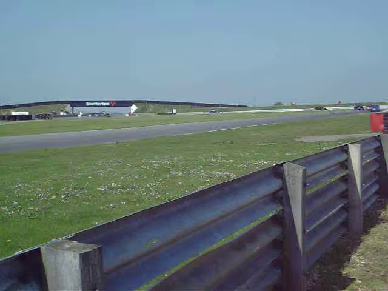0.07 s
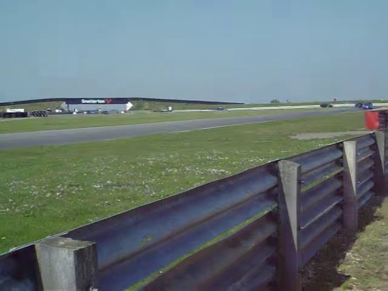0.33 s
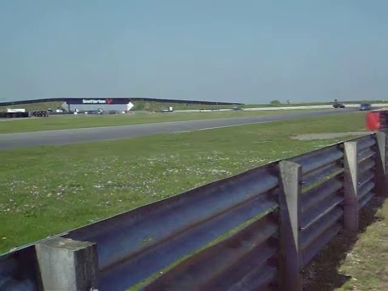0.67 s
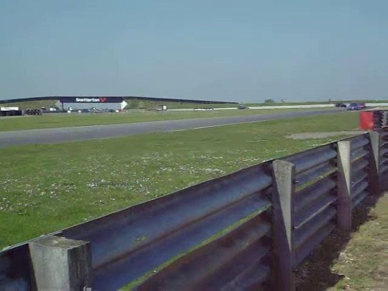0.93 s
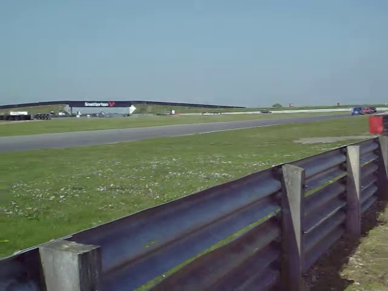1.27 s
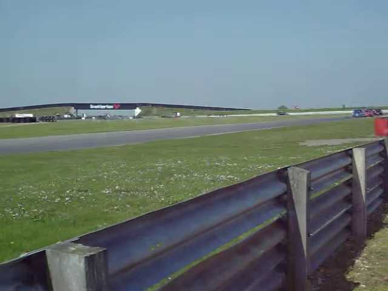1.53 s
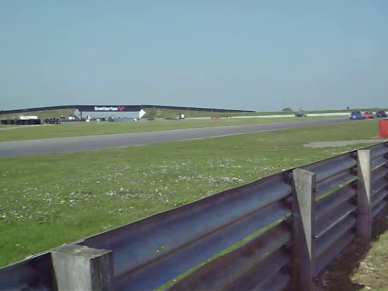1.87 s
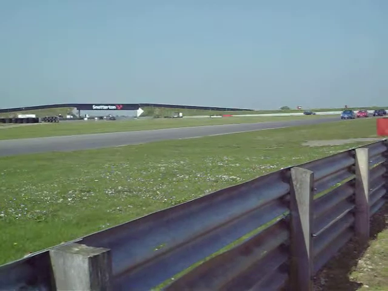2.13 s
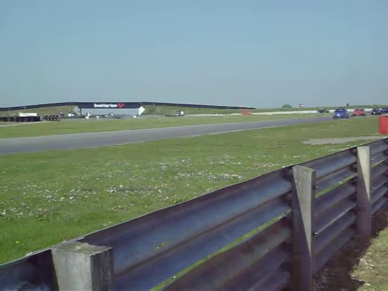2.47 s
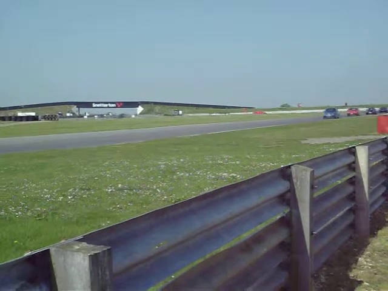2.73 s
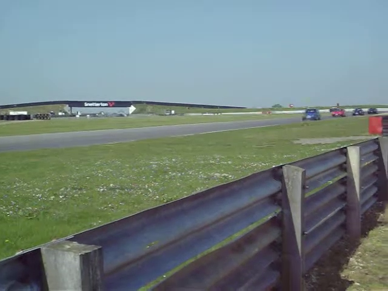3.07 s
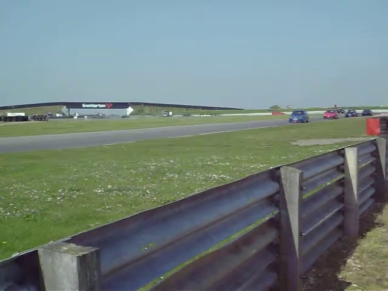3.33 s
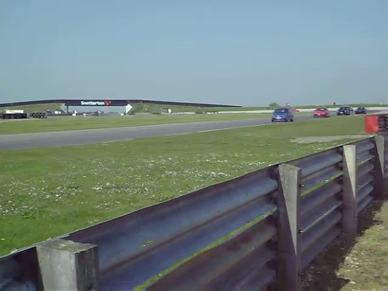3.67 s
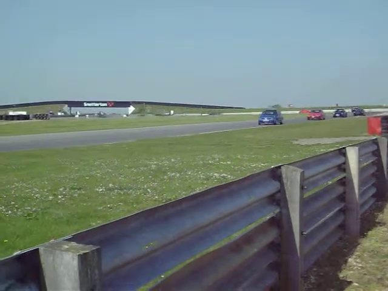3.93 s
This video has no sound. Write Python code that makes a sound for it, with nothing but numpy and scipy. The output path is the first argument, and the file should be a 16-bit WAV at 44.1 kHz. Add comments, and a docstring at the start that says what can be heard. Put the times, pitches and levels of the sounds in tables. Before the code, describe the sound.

A distant pack of racing cars makes a low, wavering drone that swells toward the end. Outdoors beside the track, wind buffets the microphone, with one sharp click early on, a faint thin whine and finally three faint chirps.

```python
"""Racing cars far across a circuit

From a microphone beside an open track, a pack of cars approaches from far off, each engine's firings
a low drone that climbs or falls. The roar of exhausts and tyres grows slowly; wind rumbles on the mic.
Close by, the camera whines faintly and its button clicks once, ducking the gain control for about
half a second. Three faint high chirps come near the end."""
import sys
import numpy as np
from scipy import signal
from scipy.fft import rfft, irfft
from scipy.io import wavfile

SR = 44100
rng = np.random.default_rng(int(sys.argv[2]) if len(sys.argv) > 2 else 0)


def transcribe(u):
    """Save the signal u as a 16-bit wav file named by the first command-line argument.

    u: samples, shape (n,) or (channels, n), limited to [-1, 1]; the rate is SR.
    q: integer samples, one column per channel.
    """
    v = np.clip(np.atleast_2d(u).T, -1, 1)
    q = np.round(v * 32767).astype(np.int16)
    wavfile.write(sys.argv[1], SR, q)


N = 176400
TIME = np.arange(N) / SR


def engines(orders=8, higher_orders_db=-39, trim_db=-1, fade_s=.053):
    """Single cars out on the track: a firing tone and its harmonics, fluttering through the air."""
    # One curve an engine. Each row: time in seconds, firing rate in Hz, firing tone in dB, octave in dB.
    curves = [
        [(.05, 122.2, -24.5, -42.5), (.5, 131.6, -23, -30.5), (.9, 138, -18, -37), (1.4, 146, -22.5, -38.5),
         (2.05, 155.5, -30, -37.5), (2.3, 158.8, -31, -44.5), (2.5, 155.8, -21.5, -48),
         (2.85, 137.1, -32, -41.5)],
        [(1.7, 118.3, -22.5, -63.5), (2.1, 122.4, -20.5, -51.5), (2.45, 120.7, -20, -37),
         (2.9, 119.7, -21.5, -38), (3.2, 118.1, -23.5, -42), (3.45, 119.5, -19, -28.5),
         (3.65, 120.6, -22, -26.5), (3.83, 122.2, -18, -21.5), (4.1, 123.5, -10, -32)],
        [(2.35, 161.4, -27.5, -53.5), (2.7, 168, -24, -69.5), (3, 176.4, -29.5, -58), (3.5, 186, -27, -56.5),
         (3.75, 189, -34, -64), (4.1, 195, -16.5, -62)],
        [(1.3, 89.8, -34.5, -36), (1.8, 98, -40, -35), (2.2, 105.2, -43.5, -31.5), (2.55, 110.8, -54, -39)],
        [(1.4, 129, -51, -49.5), (1.9, 133.4, -28.5, -36.5), (2.35, 137, -40.5, -40)],
        [(.9, 103.7, -34, -37), (1.3, 107.5, -46.5, -42.5), (1.7, 113, -35, -49), (2.2, 119.7, -57, -32),
         (2.55, 118.7, -55, -41.5)],
        [(.55, 109, -35.5, -82), (.8, 96.04, -21.5, -58), (1.2, 77.27, -35.5, -34.5), (1.5, 63.8, -30, -51.5),
         (1.8, 70.7, -30, -41.5), (2.2, 85.13, -24.5, -29.5), (2.45, 90.7, -24, -57.5), (3.1, 82, -27, -58),
         (4.1, 79, -27, -52)],
        [(.7, 109.3, -38, -65.5), (1.2, 103, -26.5, -61.5), (1.7, 94.3, -30, -38.5), (2.1, 93, -35, -43.5)],
        [(.6, 80.9, -55, -38.5), (.9, 84.7, -45, -26), (1.1, 84.5, -27, -26.5), (1.35, 83.18, -60, -33)],
        [(3.2, 124, -44, -45.5), (3.35, 123, -38, -20), (3.55, 116.6, -28, -37)],
    ]
    pitch_wander, flutter_db, roughness, rough_hz = .00302, 1.66, .2, 37
    out = np.zeros(N)
    for curve in curves:
        hz, firing_db, octave_db = in_time(curve)
        hz = hz * (1 + pitch_wander * drift(4.42))
        phase = 2 * np.pi * (np.cumsum(hz) / SR + rng.random())
        levels = [firing_db, octave_db] + [firing_db + higher_orders_db] * (orders - 2)
        drone = np.zeros(N)
        for order, db in enumerate(levels, 1):
            gain = from_db(db + trim_db + flutter_db * drift(5))
            drone += gain * np.sqrt(2) * np.sin(order * phase + 2 * np.pi * rng.random())
        fade = np.clip(np.minimum(TIME - curve[0][0], curve[-1][0] - TIME) / fade_s, 0, 1)
        uneven_firings = 1 + roughness * drift(rough_hz)
        out += drone * fade * uneven_firings
    return out


def far_pack():
    """In the distance the other engines merge into a drone, with exhaust and tyre roar above it."""
    # The colour of each. Each row: frequency in Hz, relative density in dB.
    drone_spectrum = [(50, -12), (85, 3.5), (125, 0), (170, -7.5), (220, -10), (280, -14.5), (340, -18.5),
                      (450, -35.5)]
    roar_spectrum = [(200, -9.5), (330, -12.5), (450, -4), (780, 1.5), (930, -2), (1180, -1), (1500, -7.5),
                     (1900, -10), (2300, -11), (3300, -18), (5500, -26.5)]
    # How loud each arrives at the microphone. Each row: time in seconds, level in dB.
    drone_level = [(0, -23), (1, -30), (1.6, -29.5), (2.5, -37), (3.1, -28), (3.7, -25), (4, -18)]
    roar_level = [(0, -44), (1.1, -42), (2, -42), (2.9, -41.5), (3.4, -38), (4, -38)]
    drone = noise(drone_spectrum) * from_db(in_time(drone_level)[0])
    roar = noise(roar_spectrum) * from_db(in_time(roar_level)[0] + .44 * drift(4.4))
    return drone + roar


def wind(lumpy_db=3.2, buffet_half_s=.022):
    """Slow gusts and short buffets rumble right on the microphone."""
    # The rumble's colour. Each row: frequency in Hz, relative density in dB.
    spectrum = [(15, -8), (25, -2.5), (40, 3.5), (70, -1), (120, -3), (200, -13), (400, -27.5),
                (800, -45.5)]
    # Slow gusts. Each row: time in seconds, level in dB.
    gusts = [(0, -29), (.7, -32.5), (1.2, -26.5), (1.45, -33.5), (1.75, -25), (2.15, -28), (2.4, -23.5),
             (2.7, -24.5), (2.95, -22), (3.5, -25), (3.7, -34.5), (4, -22.5)]
    # Short buffets. Each row: time of the peak in seconds, rise in dB.
    buffets = [(.26, 5), (.93, 5), (1.1, 8), (1.17, 7), (2.38, 8), (2.44, 6), (3.935, 7)]
    buffets_db = sum(db * np.exp(-((TIME - s) / buffet_half_s) ** 2) for s, db in buffets)
    return noise(spectrum) * from_db(in_time(gusts)[0] + buffets_db + lumpy_db * drift(30))


def button():
    """At the microphone, a light bright tick, then a hard double snap rings the camera's plastic body."""
    # The button's contacts. Each row: time in seconds, strength at 1 kHz in dB, tilt in dB per octave.
    contacts = [(.3070, -29, 10), (.3338, -12, -1), (.3351, 2, -1)]
    # The body's modes. Each row: frequency in Hz, level in dB, seconds to fall by 60 dB.
    modes = [(722, 1.5, 0.0072), (1030, 5, .02), (1100, 0, 0.026), (2320, -1, 0.0056), (2990, -8.5, 0.012),
             (4110, -25.5, 0.0068), (4820, -22, 0.0072)]
    s, db, tilt_db = np.transpose(contacts)
    out = np.zeros(N)
    for hz, mode_db, t60 in modes:
        clicks = np.zeros(N)
        clicks[(s * SR).astype(int)] = from_db(db + mode_db + tilt_db * np.log2(hz / 1000))
        radius, angle = from_db(-60 / (t60 * SR)), 2 * np.pi * hz / SR
        out += signal.lfilter([.5, 0, -.5], [1, -2 * radius * np.cos(angle), radius ** 2], clicks + 1e-18)
    return out


def chirps():
    """Faint high squeaks, each a narrow band of noise that glides."""
    # Each row: start and length in seconds, first and last pitch in Hz, width in Hz, level in dB.
    squeaks = [(3.53, .05, 4080, 3930, 70, -50), (3.8, .13, 3920, 4020, 160, -49),
               (3.79, .23, 4330, 4520, 10, -54)]
    out = np.zeros(N)
    for s, length, start_hz, end_hz, width_hz, db in squeaks:
        along = np.clip((TIME - s) / length, 0, 1)
        phase = 2 * np.pi * np.cumsum(start_hz + (end_hz - start_hz) * along) / SR
        band = drift(width_hz) * np.cos(phase) + drift(width_hz) * np.sin(phase)
        swell = np.sqrt(np.abs(np.sin(np.pi * along)))
        out += from_db(db) * swell * band
    return out


def camera_whine(hz=3655, rms_db=-50.5, slips_per_s=15, slip_cycles=1 / 3):
    """A thin electrical whine in the background, its phase slipping at a steady rate."""
    cycles = hz * TIME + slip_cycles * np.floor(TIME * slips_per_s)
    return from_db(rms_db) * np.sqrt(2) * np.sin(2 * np.pi * cycles)


def from_db(db):
    """Decibels to gain."""
    return 10 ** (np.asarray(db) / 20)


def rms_one(x):
    """Scale to an rms of 1."""
    return x / np.sqrt(np.mean(x ** 2) + 1e-20)


def in_time(rows):
    """A curve's columns at every sample; its first column is the time in seconds."""
    s, *columns = np.transpose(rows)
    return [np.interp(TIME, s, column) for column in columns]


def drift(rate_hz):
    """Smooth random motion with a spread of 1."""
    hop, settle = 40, 2000   # samples a step; steps for the filter to settle
    pole = np.exp(-2 * np.pi * rate_hz * hop / SR)
    white = rng.standard_normal(N // hop + settle + 2)
    slow = signal.lfilter([1], [1, -2 * pole, pole * pole], white)[settle:]
    return np.interp(np.arange(N) / hop, np.arange(len(slow)), rms_one(slow))


def noise(spectrum):
    """Noise of rms 1, coloured by rows of Hz and dB and falling away beyond them."""
    hz, db = np.transpose(spectrum)
    bins = np.maximum(np.arange(N // 2 + 1) * SR / N, 1)
    gain = from_db(np.interp(np.log(bins), np.log(hz), db))
    skirts = np.minimum(bins / hz[0], 1) ** 2 * np.minimum(hz[-1] / bins, 1) ** 2
    return rms_one(irfft(rfft(rng.standard_normal(N)) * gain * skirts, N))


def scene():
    """Everything at one microphone beside the track."""
    return (engines() + far_pack() + wind() + button() + chirps() + camera_whine())[None]


def gain_control(x, limit_db=.5, start_cut_db=8.5, attack_s=.0003, release_db_per_s=27.5):
    """The gain starts low and climbs steadily back to full; peaks over the limit pull it down."""
    peak_db = 20 * np.log10(np.abs(x).max(axis=0) + 1e-9)
    over_db = np.maximum(peak_db - limit_db, 0)
    climb_db = release_db_per_s * TIME
    cut_db = np.maximum(np.maximum.accumulate(over_db + climb_db), start_cut_db) - climb_db
    pole = np.exp(-1 / (attack_s * SR))
    return x * from_db(-signal.lfilter([1 - pole], [1, -pole], cut_db))


def record(dry):
    """The camera's input: gain control, rounded peaks, hiss and a steep treble cut."""
    # The recorder's hiss. Each row: frequency in Hz, relative density in dB.
    hiss_spectrum = [(300, -3.5), (2000, 6), (4000, 11), (5300, 8.5), (6500, -26)]
    ceiling, hiss_db, opens_s, cutoff_hz = .7, -54.5, .068, 5650
    x = gain_control(dry)
    x = x / (1 + (x / ceiling) ** 4) ** (1 / 4)
    x = x + from_db(hiss_db) * noise(hiss_spectrum)
    x = x * np.clip((TIME - opens_s) / .003, 0, 1)   # silent until the input opens
    return signal.sosfilt(signal.ellip(8, .3, 80, cutoff_hz, fs=SR, output="sos"), x)


dry = scene()
out = record(dry)
transcribe(out)
```